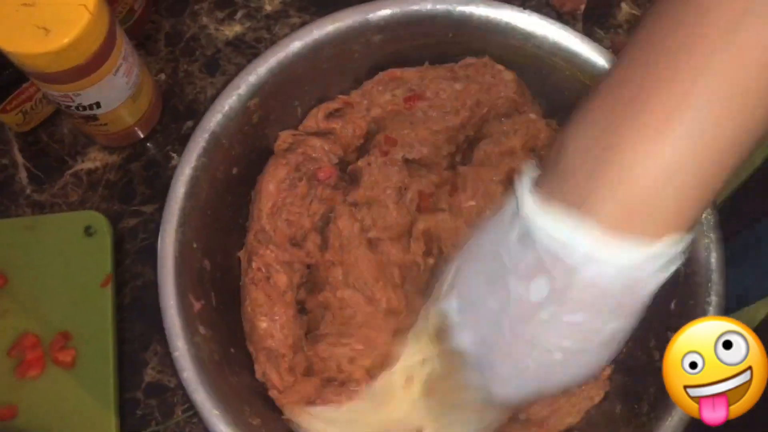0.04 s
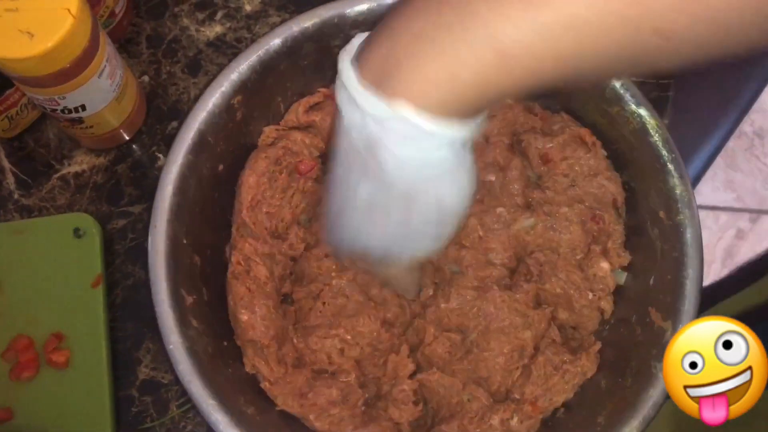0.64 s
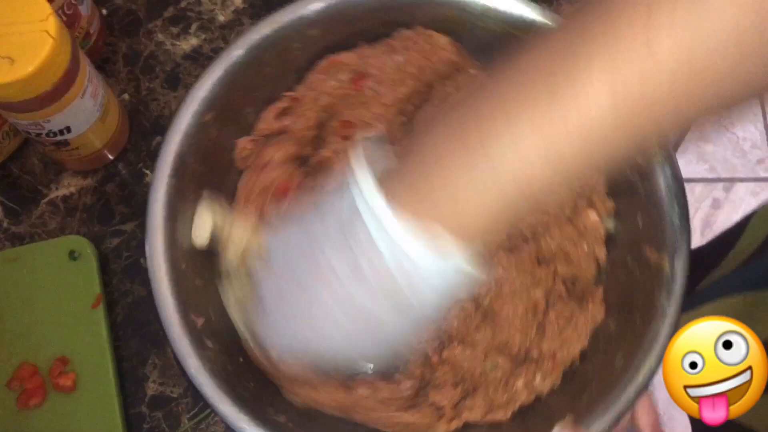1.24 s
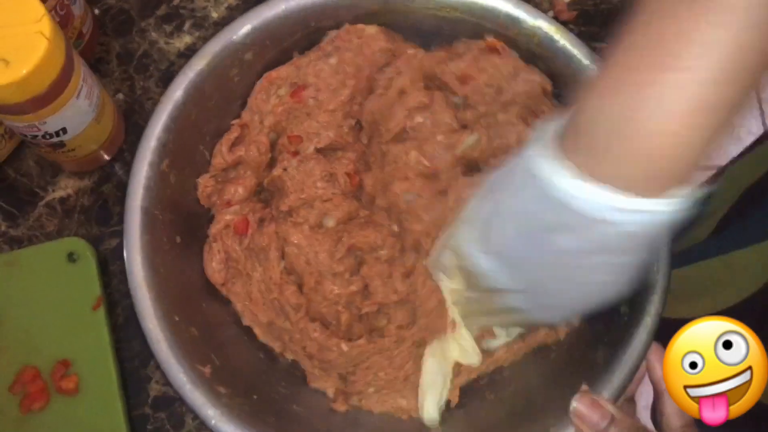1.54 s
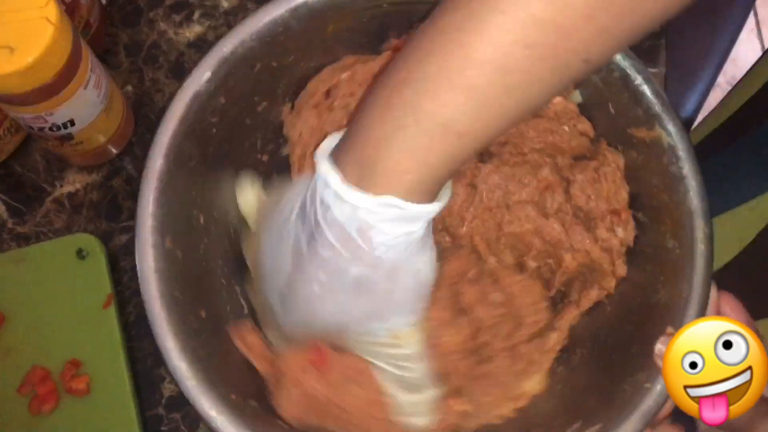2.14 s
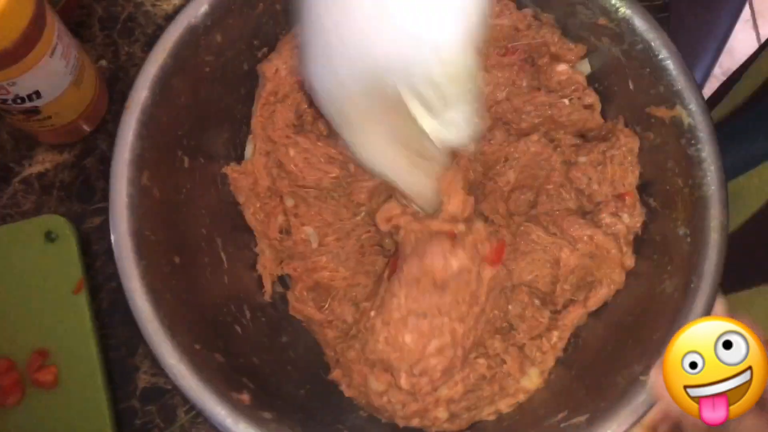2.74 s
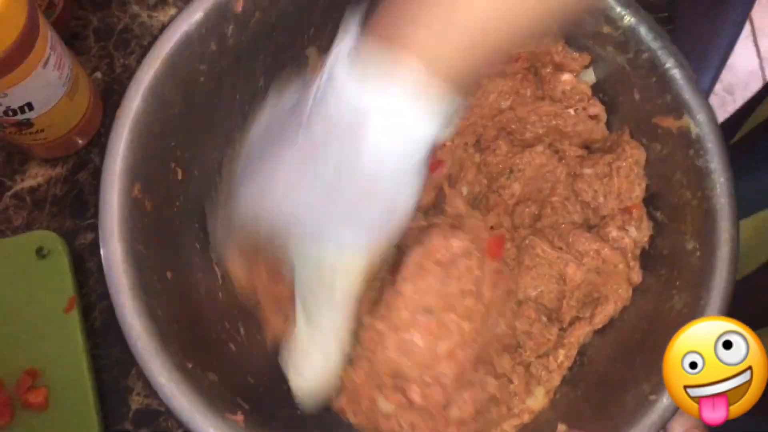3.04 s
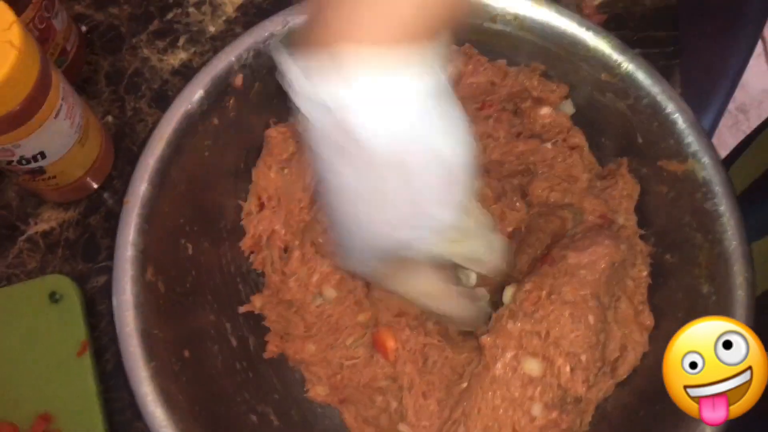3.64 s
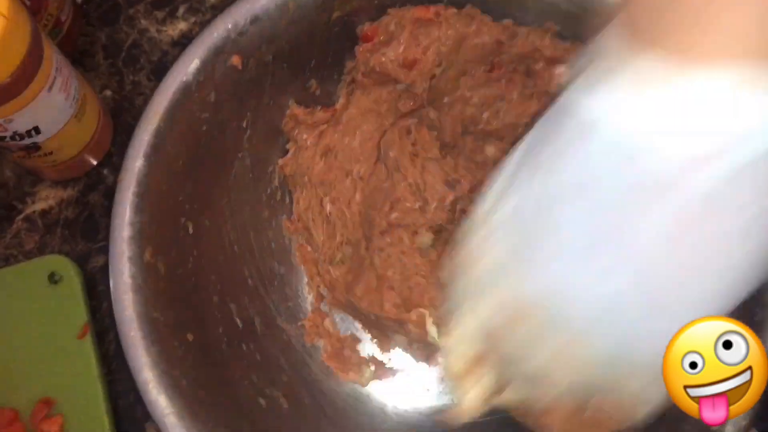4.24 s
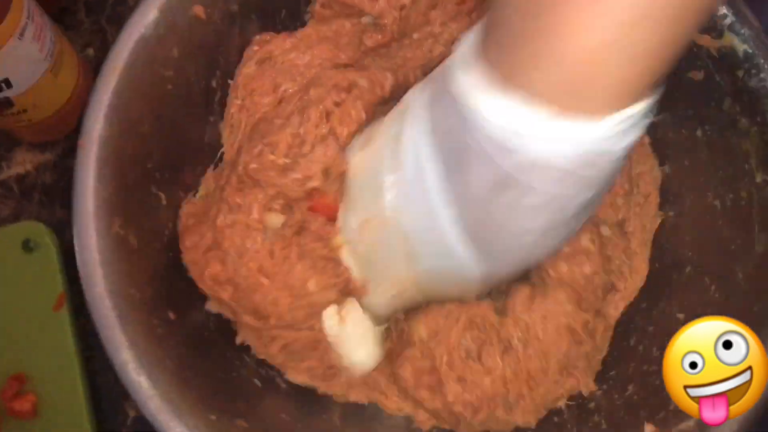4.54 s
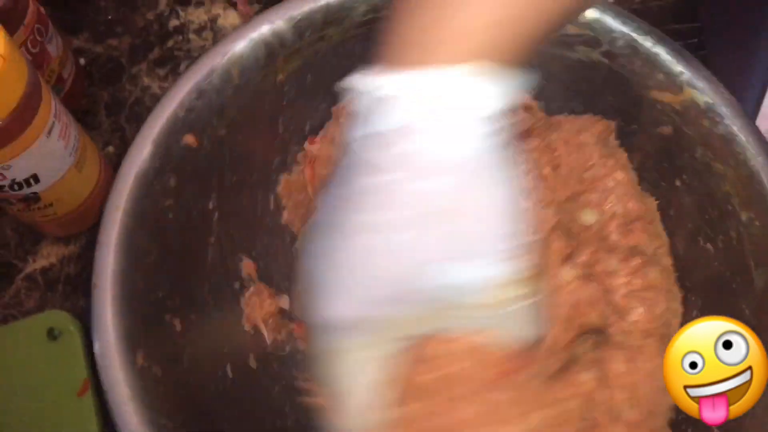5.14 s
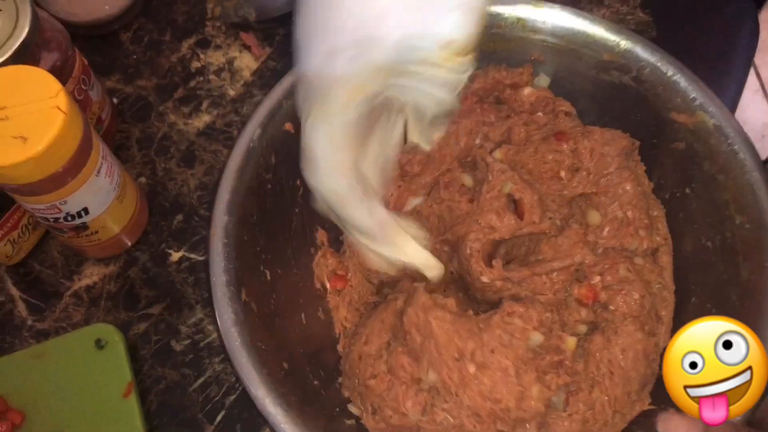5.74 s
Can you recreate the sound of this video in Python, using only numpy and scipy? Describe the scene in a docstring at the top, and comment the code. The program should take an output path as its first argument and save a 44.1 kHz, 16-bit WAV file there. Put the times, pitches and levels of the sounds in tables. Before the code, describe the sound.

A gloved hand kneads wet minced meat in a steel bowl, close to the microphone in a small kitchen. Irregular squeezes crackle and squelch, with tiny air pops throughout. The lump slaps down early, again midway and once more near the end. The heavy bowl rubs and knocks dully on the counter, ringing briefly, over a low handling rumble and a faint room hum.

```python
"""Kneading meat in a steel bowl

A gloved hand kneads wet minced meat close by. Each squeeze tears sticky films that crackle, and air
pockets pop. The lump is slapped down and the glove slithers on the steel. The loaded bowl rubs and
bumps dully on the counter, over a low handling rumble and the steady noise of a small kitchen."""
import sys
import numpy as np
from scipy import signal
from scipy.fft import rfft, irfft
from scipy.io import wavfile
from scipy.ndimage import map_coordinates

SR = 44100
rng = np.random.default_rng(int(sys.argv[2]) if len(sys.argv) > 2 else 0)


def inscribe(sig):
    """Save sig as 16-bit PCM at rate SR to the path in sys.argv[1].

    A 1-D sig is mono; a 2-D sig holds one channel per row.
    Samples are clipped to [-1, 1] before scaling.
    """
    pcm = np.round(np.clip(np.atleast_2d(sig).T, -1, 1) * 32767)
    wavfile.write(sys.argv[1], SR, pcm.astype(np.int16))


N = 255206
TIME = np.arange(N) / SR
HZ = np.maximum(np.arange(N // 2 + 1) * SR / N, 1)

# Tone curves, saying how strong each pitch is next to the others: pitch_hz, level_db
KITCHEN_TONE = [(18, -29), (30, -27), (55, 9.5), (92, -39), (150, -25), (222, -1.5), (374, -11.5),
                (511, -18), (1000, -30.5), (2370, -22), (3590, -30), (4300, -27.5), (5000, -25.5),
                (5800, -31.5), (8690, -40), (15000, -79)]
RUMBLE_TONE = [(10, -56), (22, 7), (33, 8.5), (50, 5.5), (75, -5), (110, -26), (220, -69), (500, -65)]
MEAT_CRACKLE_TONE = [(1800, -4), (2800, 8.5), (3600, 5), (4700, 6.5), (6000, 7.5), (7200, 5.5), (9000, -3),
                     (12000, -23)]
WALL_CRACKLE_TONE = [(1800, -9), (2700, -40), (3400, -11.5), (4300, -2.5), (5200, 3), (6200, -6.5),
                     (7200, -7), (8700, -8), (12000, -32)]  # against the bare bowl wall
MEAT_SPRAY_TONE = [(6000, 2.5), (8500, -3), (9500, 4), (11000, 0), (12600, 0), (14000, -16), (16000, -28)]  # spray is the finest, highest crackle
WALL_SPRAY_TONE = [(6000, 5.5), (8500, 1.5), (9500, 5.5), (11000, -4.5), (12600, -13), (14000, -16),
                   (16000, -28)]
SQUELCH_TONE = [(600, -34), (1200, 2), (1700, -4.5), (2300, 2.5), (2750, 1.5), (3300, -5.5), (5000, -32.5)]
RUB_TONE = [(200, -16), (450, 6.5), (600, 4.5), (780, 4.5), (960, 3), (1170, 0.5), (1280, -3), (1430, -7.5),
            (2500, -20), (7000, -61)]
GROAN_TONE = [(60, 1), (150, 3.5), (230, -3.5), (400, -9.5), (520, -13.5), (1200, -31.5)]
SLITHER_TONE = [(1500, -13), (2400, 17), (3500, -19), (5000, 6.5), (6200, -6), (7200, 2), (9500, -8.5),
                (12300, -1), (14000, -25), (16000, -29)]

# How loud the rumble and the sliding glove are over time: time_s, level_db
RUMBLE_LEVELS = [(0, -40.5), (.2, -29.5), (.45, -32), (.75, -47), (.9, -43.5), (1.05, -34.5), (1.45, -31),
                 (1.75, -33), (1.96, -29.5), (2.12, -37), (2.6, -31), (3.1, -37), (4.65, -37.5),
                 (5.1, -40.5), (5.78, -39)]
SLITHER_LEVELS = [(1.76, -88), (1.84, -64), (1.9, -51.5), (2.1, -58), (2.2, -54), (2.33, -57), (2.58, -63),
                  (2.66, -59.5)]
# The notes of the bowl, damped by the meat: pitch_hz, width_hz, level_db
BOWL_NOTES = [(127.5, 13.2, -1.5), (147.2, 18.7, 3.5), (188.9, 9.3, 0.5), (301, 48, 0.5), (336, 71, -4),
              (378.3, 9.7, 3.5), (467, 11, -9.5), (585, 45, -2), (790, 110, -9.5), (853, 30, -5),
              (1163, 33, -11)]
# The notes of the hollow between glove and bowl wall: pitch_hz, width_hz, level_db
HOLLOW_NOTES = [(2570, 110, -13), (5200, 490, -1), (6900, 410, -11)]

# The hand squeezes the meat: tightest_s, closing_s, opening_s, crackle_db, spray_db, squelch_db
SQUEEZES = [(.02, 0.039, 0.041, -56.5, -61, -60), (.11, 0.044, 0.0588, -48.5, -62, -56),
            (.23, 0.036, 0.0421, -58, -85, -78), (0.334, 0.0201, 0.0324, -46, -57.5, -75),
            (.48, 0.0628, 0.12, -47.5, -68, -58), (.72, 0.0378, 0.0313, -50, -62, -57),
            (.87, 0.0874, 0.055, -50.5, -64, -62), (1.15, 0.0804, 0.1187, -50, -69, -79),
            (1.351, 0.06, 0.13, -56.5, -64.5, -54.5), (1.54, 0.015, 0.043, -52, -57, -46),
            (1.95, 0.056, 0.06, -60.5, -79, -50.5), (2.18, 0.0617, 0.0488, -58, -53.5, -54.5),
            (2.42, 0.025, 0.035, -65, -55.5, -64), (2.56, 0.0474, 0.044, -59, -57, -51),
            (2.958, 0.09, 0.049, -52, -64, -50.5), (3.12, 0.1346, 0.0884, -50.5, -72, -60),
            (3.351, 0.067, 0.071, -49, -73, -62), (3.532, 0.067, 0.0545, -48.5, -78, -49),
            (3.928, 0.12, 0.1027, -49.5, -64, -53), (4.14, 0.1085, 0.153, -60, -78, -63),
            (4.39, 0.1444, 0.0413, -51.5, -57.5, -54.5), (4.558, 0.0816, 0.042, -49.5, -68, -49.5),
            (4.874, 0.043, 0.073, -51, -64, -50.5), (5.049, 0.0755, 0.095, -49, -58.5, -56.5),
            (5.29, 0.0445, 0.099, -71, -50.5, -52.5), (5.437, 0.0222, 0.014, -60, -45, -47.5),
            (5.5, 0.04, 0.036, -59, -49, -46), (5.77, 0.054, 0.068, -73, -81, -61)]
# Air pockets, glove snaps, and one very short, dry click at 1.712 s:
# start_s, peak_db, pitch_hz, width_octaves, fade_s
POPS_AND_SNAPS = [(0.118, -31, 2230, 0.41, 0.0033), (0.202, -38, 3230, 0.57, .003),
                  (0.33, -28.5, 3670, 1.3, 0.0083), (0.504, -29.5, 2270, 0.72, 0.017),
                  (0.598, -31, 5960, 0.68, 0.0018), (0.615, -40, 2870, 0.7, 0.0061),
                  (0.648, -38, 2700, 0.45, .0015), (.6635, -35, 3350, 1.1, .004),
                  (0.72, -35, 2730, 0.38, 0.0064), (0.726, -33, 4500, 0.45, 0.0019),
                  (0.791, -40, 2650, 0.16, 0.0037), (0.822, -43, 3450, .25, .004),
                  (.987, -31, 3600, 1.5, 0.0014), (1.072, -28, 5530, 0.63, 0.002),
                  (1.102, -38.5, 1150, 0.22, 0.0062), (1.171, -35.5, 4730, 0.32, 0.0022),
                  (1.228, -34, 3100, .8, 0.0044), (1.537, -30, 2370, .35, 0.0018),
                  (1.712, -28, 6000, 1.8, 0.00016), (1.744, -33, 2280, 0.45, 0.0036),
                  (1.756, -23.5, 2400, 0.46, 0.00079), (2.129, -31.5, 930, 0.93, 0.0033),
                  (2.179, -29.5, 1750, 2.4, 0.0029), (2.209, -30, 2230, 0.81, 0.0022),
                  (2.502, -31.5, 3100, 1.2, 0.0061), (2.57, -34.5, 3200, 1.1, 0.0052),
                  (2.683, -36, 1550, 1.45, 0.022), (2.872, -33, 8000, 0.57, .0006),
                  (2.88, -30, 2760, 1.34, 0.0018), (2.967, -40, 1300, 0.5, 0.0033),
                  (3.003, -36, 1440, .36, 0.0031), (3.311, -36.5, 8000, .5, .002),
                  (3.522, -32, 940, 0.84, 0.008), (3.589, -34.5, 4560, 0.58, 0.005),
                  (3.749, -32, 1470, 2, 0.0016), (3.7755, -23, 5400, 0.76, 0.0038),
                  (3.777, -27, 775, 3.4, 0.0043), (3.852, -29, 764, 2.1, 0.004),
                  (3.8778, -15, 4920, 0.54, 0.00064), (3.878, -22.5, 1650, 1.05, 0.0023),
                  (4.041, -37, 930, 1.1, 0.0029), (4.24, -33.5, 2420, 0.71, 0.0018),
                  (4.378, -39, 900, 1.3, 0.002), (4.379, -33.5, 5000, 0.21, 0.0049),
                  (4.43, -31, 5130, 0.59, 0.0019), (4.464, -37, 5000, 1, 0.0012),
                  (4.46, -36, 795, 0.65, 0.0026), (4.478, -27, 950, 1.1, .002),
                  (4.4951, -27, 1280, 0.31, 0.0011), (4.496, -29, 3730, 1.9, 0.0016),
                  (4.506, -36, 4660, 0.18, 0.0029), (4.514, -32.5, 875, 0.29, 0.0018),
                  (4.5341, -38, 2530, 0.15, 0.0021), (4.535, -33, 970, 1.1, 0.0038),
                  (4.553, -31, 4900, 1.4, .003), (4.558, -41, 1270, 0.39, 0.0035),
                  (4.5706, -38, 4650, 0.11, 0.0078), (4.571, -37.5, 870, 0.45, 0.0027),
                  (4.833, -36, 2240, 2, .004), (5.01, -31.5, 2060, 0.53, 0.0011),
                  (5.037, -33, 2200, 1.2, 0.001), (5.262, -26.5, 2600, 1.1, 0.0064),
                  (5.263, -36.5, 7850, 0.32, 0.029), (5.27, -27, 900, 1.5, 0.039),
                  (5.436, -25.5, 3620, 0.37, 0.0027), (5.476, -25, 1470, 2.2, 0.0018),
                  (5.617, -42, 3800, 2.3, 0.0033), (5.698, -38.5, 3700, 1.6, 0.0061),
                  (5.764, -36.5, 3270, 2, 0.0058)]
# The bowl is pushed along the counter: hardest_s, build_s, ease_s, rub_db, groan_db
PUSHES = [(.29, 0.027, 0.024, -46.5, -55), (.41, 0.077, 0.091, -41.5, -41.5), (.49, 0.033, 0.01, -34, -31),
          (.78, 0.09, 0.095, -49.5, -39), (1.12, 0.094, 0.027, -53.5, -40),
          (1.31, 0.021, 0.078, -35.5, -26), (1.47, 0.096, 0.081, -37.5, -31.5),
          (1.96, 0.36, 0.24, -49.5, -43.5), (2.19, 0.13, 0.15, -46, -36.5), (2.57, 0.078, 0.11, -46.5, -53),
          (3.0, 0.22, 0.27, -53.5, -61), (3.53, 0.066, 0.047, -45, -38), (3.78, 0.024, 0.091, -44.5, -36),
          (4.38, 0.078, 0.045, -42.5, -33), (4.5, 0.088, 0.64, -48, -41), (4.88, 0.024, 0.38, -47, -43),
          (5.45, 0.13, 0.098, -42.5, -35.5)]
# The lump is flung down: start_s, smack_db, smack_hz, body_db, body_hz, weight_db, weight_hz, ring_db
MEAT_SLAPS = [(0.498, -8.5, 820, -5, 374, -20, 70, -12), (0.5101, -6, 910, -3.5, 211, 0.5, 69, -16),
              (2.682, -25, 860, -13.5, 160, -3, 45.4, -11), (5.2611, -8.5, 995, -10.5, 232, -19, 100, 2)]
# The bowl rocks and knocks on the counter: start_s, level_db, pitch_hz, ring_db
BOWL_BUMPS = [(.526, -13.5, 99, -22), (0.553, -16.5, 56.6, -18), (.967, -36, 180, 4.5),
              (1.106, -29, 413, -9), (1.175, -23, 37.6, -20), (1.307, -29.5, 170, 10),
              (1.347, -19.5, 143, -6), (1.36, -17, 59, -23), (1.43, -18, 370, -9.5),
              (1.442, -17, 61.6, -22), (1.505, -32, 260, 5), (1.616, -20, 41.2, -22),
              (1.9, -16.5, 43.4, -20), (1.937, -24.5, 138, -5), (1.964, -19, 51.6, -15),
              (2.198, -30, 209, 3), (2.257, -24.5, 268, -21), (2.282, -31, 550, 4), (2.292, -31, 477, 0),
              (2.321, -18.5, 41.5, -24), (2.459, -35.5, 290, 6.5), (2.625, -27, 337, -2.5),
              (2.639, -27.5, 200, 1), (2.688, -12, 440, -22), (2.694, -14, 105, -17), (2.704, -22, 476, -9),
              (2.767, -27, 483, -17), (3.435, -23, 380, -1), (3.45, -24.5, 191, 4), (3.611, -24, 50, -20),
              (3.803, -23.5, 300, -10), (3.814, -28, 171, 3.5), (4.361, -40, 190, -2), (4.62, -31, 150, -1),
              (4.701, -18, 96.5, -42), (5.271, -13, 199, -18), (5.292, -12.5, 205, -16),
              (5.411, -26, 342, 2), (5.422, -20, 104, -11), (5.591, -28, 272, 3.5),
              (5.596, -26.5, 127, -0.5), (5.702, -34, 202, 6), (5.766, -23.5, 294, -0.5),
              (5.77, -25, 129, 2)]
# A film of meat peels off the glove: peak_s, snaps_db, squish_db, fade_s
FILM_PEELS = [(2.143, -60, -52, 0.0084), (2.18, -46, -49, .008), (2.418, -44, -58, 0.0031),
              (2.488, -46, -58, .003), (2.533, -59, -50.5, 0.028), (2.91, -46, -54, .006),
              (2.929, -45, -51, .014), (2.962, -43.5, -45, 0.0072), (3.047, -45, -59, 0.025),
              (3.085, -49, -53, .012), (3.157, -57, -53, 0.018), (3.335, -52, -60, 0.0053),
              (3.366, -48, -57, .012), (3.393, -46, -62, .008), (3.498, -50, -43, 0.009),
              (3.92, -55, -51, .025), (4.334, -52, -54, .006), (4.387, -46, -59, 0.014),
              (4.464, -48, -53, .008), (4.488, -52, -48, 0.02), (4.531, -56, -44, 0.014),
              (4.552, -49, -44, 0.023), (4.963, -60, -46.5, 0.013), (5.02, -47, -53, 0.01),
              (5.048, -44, -58, 0.0074), (5.085, -43, -56, 0.0096), (5.105, -58, -63, .008),
              (5.257, -56, -38, 0.031), (5.433, -39, -38, 0.0054)]

KNOCK_DB, RING_DB = -4.5, 1.5  # added to every slap and bump: the hit itself, the bowl's ring


def undb(db):
    """Turn decibels into a number to multiply a sound by."""
    return 10 ** (np.asarray(db) / 20)


def unit(x):
    """Scale x to an average strength (rms) of 1."""
    return x / np.sqrt(np.mean(x ** 2))


def add(out, start_s, x):
    """Mix x into out, beginning at start_s."""
    i = max(int(start_s * SR), 0)
    out[i:i + len(x)] += x[:max(N - i, 0)]


def colour(x, tone):
    """Shape x with a tone curve, then scale it to strength 1."""
    hz, db = np.transpose(tone)
    curve_db = np.interp(np.log(HZ), np.log(hz), db)
    return unit(irfft(rfft(x) * undb(curve_db), N))


def clicks(per_s, spread_db):
    """Random clicks: many small, a few large."""
    chance, size = rng.random(N), rng.standard_normal(N)
    return (chance < per_s / SR) * rng.choice([-1, 1], N) * undb(spread_db * np.minimum(size, 2))


def flutter(per_s, depth_db):
    """A loudness that wanders at random, per_s times a second."""
    points = rng.standard_normal(4096)
    return unit(undb(depth_db * np.interp(TIME * per_s, np.arange(len(points)), points)))


def bubbles(low_hz, high_hz, cycles, spread_db, glide, count):
    """Tiny air holes open: each rings for a few cycles and rises in pitch."""
    out, t = np.zeros(N), TIME[:600]
    for (when, pitch), size in zip(rng.random((count, 2)), rng.standard_normal(count)):
        hz = low_hz * (high_hz / low_hz) ** pitch
        age = hz * t / cycles
        ring = np.sin(2 * np.pi * hz * t * (1 + glide * np.minimum(age, 2))) * np.exp(-age)
        add(out, when * N / SR, undb(spread_db * min(size, 2)) * ring)
    return unit(out)


def resonate(x, notes, tuning=1):
    """Let x ring an object that has these notes."""
    return sum(undb(db) * signal.lfilter(*signal.iirpeak(hz * tuning, hz / width_hz, fs=SR), x)
               for hz, width_hz, db in notes)


def strike(noise, hz, octaves, fade_s, sputter=1, order=3):
    """A sharp hit and a short sputter, kept to one range of pitches, with a peak of 1."""
    force = sputter * noise * np.exp(-TIME[:len(noise)] / fade_s) / np.sqrt(fade_s * SR / 2)
    force[0] += 1
    top_hz = min(hz * 2 ** (octaves / 2), SR / 2.5)
    band = signal.butter(2, [top_hz / 2 ** octaves, top_hz], "band", fs=SR, output="sos")
    soften = signal.butter(order, top_hz * 1.19, fs=SR, output="sos")
    hit = signal.sosfilt(soften, signal.sosfilt(band, force))
    return hit / np.abs(hit).max()


def thud(noise, hz, octaves, cycles):
    """A soft hit: the lower it is, the longer it takes to settle."""
    top_hz = hz * 2 ** (octaves / 2)
    return strike(noise, hz, octaves, fade_s=cycles / top_hz, order=5)


def swell(peak_s, rise_s, fall_s):
    """A loudness that rises to a rounded top and fades."""
    return np.exp(-.5 * ((TIME - peak_s) / np.where(TIME < peak_s, rise_s, fall_s)) ** 2)


def surge(peak_s, rise_s, fall_s):
    """A loudness that builds to a sharp peak and eases off."""
    return np.exp(-np.maximum((peak_s - TIME) / rise_s, (TIME - peak_s) / fall_s))


def blend(shapes, levels_db, rest_db=-100):
    """Join overlapping swells or surges into one loudness, over a resting level."""
    return np.sqrt(undb(levels_db) ** 2 @ np.square(shapes) + undb(rest_db) ** 2)


def kitchen(level_db=-47):
    """The steady background noise of the room."""
    return undb(level_db) * colour(rng.standard_normal(N), KITCHEN_TONE)


def handling_rumble():
    """Handling the bowl makes a low, uneven rumble."""
    loudness = undb(np.interp(TIME, *np.transpose(RUMBLE_LEVELS))) * flutter(19, 0.68)
    return loudness * colour(rng.standard_normal(N), RUMBLE_TONE)


def kneading(wall_s=2.3, hollow_glide=0.056):
    """Sticky films tear in little runs; from about wall_s they sound thin and hollow on the bare bowl."""
    *_, crackle_db, spray_db, squelch_db = np.transpose(SQUEEZES)
    squeezes = [swell(s, closing_s, opening_s) for s, closing_s, opening_s, *_ in SQUEEZES]
    on_wall = np.clip((TIME - wall_s) / .5 + .5, 0, 1)  # goes from 0 to 1 in half a second
    runs = flutter(110, 2.3)
    tears = unit(clicks(5000, 6.1)) * runs
    films = tears + undb(-11) * bubbles(2600, 9800, cycles=9, spread_db=2.4, glide=.012, count=3000)
    smacks = undb(-11) * bubbles(2200, 5200, cycles=4, spread_db=3, glide=.03, count=150)
    snaps = undb(-9) * bubbles(4300, 8500, cycles=4, spread_db=3.5, glide=.01, count=300)

    # The hollow under the glove rises in pitch as the hand closes.
    grip = np.max(squeezes, axis=0)
    speed = 1 + hollow_glide * (grip - grip.mean())
    hollow = resonate(clicks(3300, 3.2) * runs, HOLLOW_NOTES)
    hollow = undb(-4) * unit(map_coordinates(hollow, [np.cumsum(speed)], mode="mirror"))
    meat_crackle = unit(colour(films, MEAT_CRACKLE_TONE) + smacks)
    wall_crackle = unit(colour(films, WALL_CRACKLE_TONE) + hollow + snaps)
    crackle = (1 - on_wall) * meat_crackle + on_wall * wall_crackle

    pockets = unit(clicks(5000, 2.4))
    pockets += undb(-16) * bubbles(790, 3310, cycles=7.9, spread_db=.91, glide=.023, count=800)
    small_pops = undb(-10) * bubbles(900, 3200, cycles=3.5, spread_db=3.5, glide=.03, count=120)
    squelch = colour(pockets * runs, SQUELCH_TONE) + small_pops

    glove_ticks = undb(-14) * unit(clicks(34, 9.5))
    spray = (1 - on_wall) * colour(tears + glove_ticks, MEAT_SPRAY_TONE)
    spray += on_wall * colour(tears + glove_ticks, WALL_SPRAY_TONE)

    # Meat clings to the glove, so it never goes quite silent between squeezes.
    return (blend(squeezes, crackle_db, rest_db=-70) * crackle
            + blend(squeezes, spray_db) * spray
            + blend(squeezes, squelch_db, rest_db=-60) * squelch)


def pops_and_snaps():
    """Bursting air pockets, glove snaps and one dry click: each starts sharply and sputters briefly."""
    out = np.zeros(N)
    for start_s, peak_db, hz, octaves, fade_s in POPS_AND_SNAPS:
        pop = strike(rng.standard_normal(4096), hz, octaves, fade_s, sputter=7)
        add(out, start_s, undb(peak_db) * pop)
    return out


def bowl_rubbing(resting_arm_db=-41.5):
    """The bowl sticks and slips on the counter, and the weight of the arm makes it groan."""
    *_, rub_db, groan_db = np.transpose(PUSHES)
    pushes = [surge(s, build_s, ease_s) for s, build_s, ease_s, *_ in PUSHES]
    slips = clicks(3000, 2.2) * flutter(70, 2.2)
    rub = colour(slips + resonate(slips, BOWL_NOTES), RUB_TONE)
    groan = colour(resonate(clicks(1200, 3.24), BOWL_NOTES), GROAN_TONE)
    return blend(pushes, rub_db) * rub + blend(pushes, groan_db, resting_arm_db) * groan


def meat_slaps(body_lag_s=0.00198, weight_lag_s=0.00613):
    """First a wet smack, then the lump's body lands and rings the bowl, then it shakes the counter."""
    knocks, on_steel = np.zeros((2, N))
    for start_s, smack_db, smack_hz, body_db, body_hz, weight_db, weight_hz, ring_db in MEAT_SLAPS:
        noise = rng.standard_normal((3, 8192))
        smack = undb(smack_db) * thud(noise[0], smack_hz, octaves=0.84, cycles=4.5)
        body = undb(body_db) * thud(noise[1], body_hz, octaves=1.55, cycles=4.5)
        weight = undb(weight_db) * strike(noise[2], weight_hz, octaves=2.08, fade_s=0.014)
        add(knocks, start_s, smack)
        add(knocks, start_s + body_lag_s, body)
        add(knocks, start_s + weight_lag_s, weight)
        add(on_steel, start_s, undb(ring_db - 5) * smack)
        add(on_steel, start_s + body_lag_s, undb(ring_db) * body)
    return undb(KNOCK_DB) * knocks + undb(RING_DB) * resonate(on_steel, BOWL_NOTES)


def bowl_bumps():
    """The bowl knocks dully on the counter and the steel rings briefly."""
    out = np.zeros(N)
    noises = rng.standard_normal((len(BOWL_BUMPS), 8192))
    for (start_s, level_db, hz, ring_db), noise in zip(BOWL_BUMPS, noises):
        knock = undb(level_db) * thud(noise, hz, octaves=1.176, cycles=5.6)
        tuning = 1 + 0.036 * rng.uniform(-1.8, 1)  # the shifting meat retunes the bowl a little
        ring = resonate(knock, BOWL_NOTES, tuning)
        add(out, start_s, undb(KNOCK_DB) * knock + undb(RING_DB + ring_db) * ring)
    return out


def glove_slither():
    """The wet glove slides over steel in many tiny slips, catching now and then."""
    slips = unit(clicks(5400, 4.3) * flutter(60, 3.5))
    catches = undb(-2) * unit(clicks(200, 4.5))
    loudness = undb(np.interp(TIME, *np.transpose(SLITHER_LEVELS)))
    return loudness * colour(slips + catches, SLITHER_TONE)


def film_peels(rise_s=0.0013):
    """A sticky film lets go all at once: tiny wet snaps, and a squish as larger holes open."""
    _, snaps_db, squish_db, _ = np.transpose(FILM_PEELS)
    bursts = [surge(peak_s, rise_s, fade_s) for peak_s, *_, fade_s in FILM_PEELS]
    snaps = bubbles(4200, 9500, cycles=3.5, spread_db=3, glide=.02, count=5000)
    squish = bubbles(1000, 3000, cycles=2.5, spread_db=2, glide=.03, count=4500)
    return blend(bursts, snaps_db) * snaps + blend(bursts, squish_db) * squish


def room(x, low_fade_s=0.33, high_fade_s=0.12):
    """Add echoes from the walls: low sounds linger, high ones die quickly."""
    t = TIME[:16384]
    low, high = rng.standard_normal((2, len(t))) * (t > .005)  # echoes begin after 5 ms
    low_band = signal.butter(4, [130, 430], "band", fs=SR, output="sos")
    high_band = signal.butter(1, [500, 7000], "band", fs=SR, output="sos")
    low = signal.sosfilt(low_band, low * undb(-60 * t / low_fade_s))
    high = signal.sosfilt(high_band, high * undb(-60 * t / high_fade_s))
    echoes = (undb(-9.5) * low + undb(-8.5) * high) / np.sqrt(SR * low_fade_s / np.log(10 ** 6))
    return x + signal.fftconvolve(x, echoes)[:N]


def scene():
    """Hand, meat and bowl in the kitchen, as one channel."""
    hits = meat_slaps() + bowl_bumps() + pops_and_snaps()
    wet_sounds = kneading() + film_peels() + glove_slither()
    movement = bowl_rubbing() + handling_rumble()
    return (room(hits + wet_sounds + movement) + kitchen())[None]


def record(dry, top_hz=15800):
    """Cut away the very highest treble."""
    return signal.sosfilt(signal.ellip(10, .2, 80, top_hz, fs=SR, output="sos"), dry)


dry = scene()
out = record(dry)
inscribe(out)
```